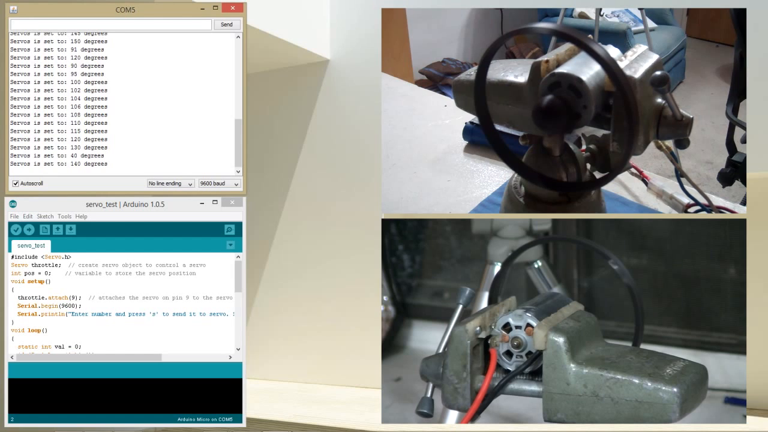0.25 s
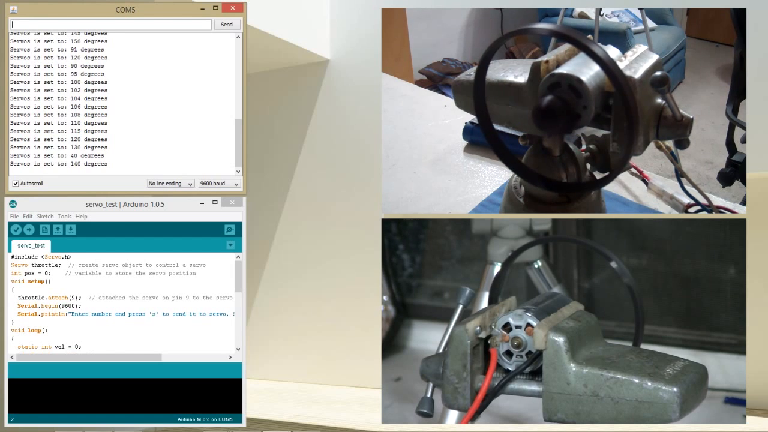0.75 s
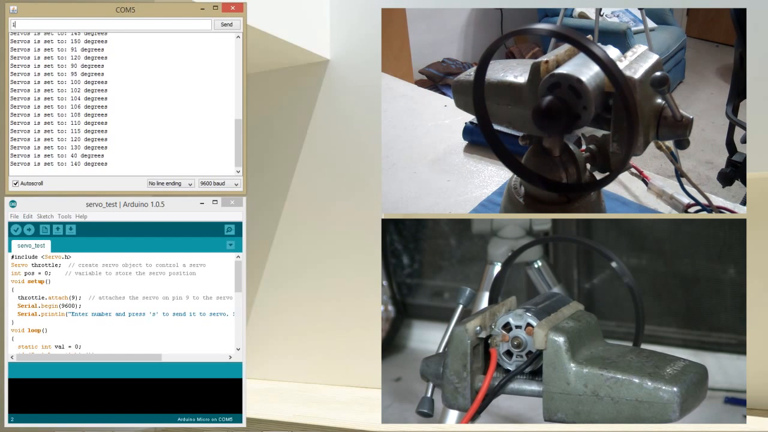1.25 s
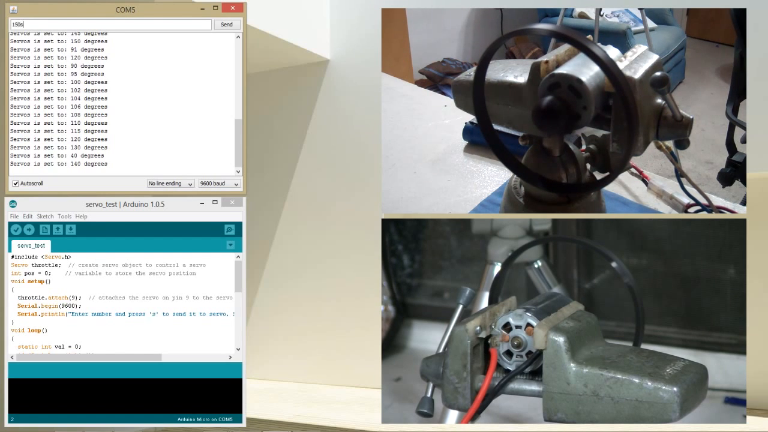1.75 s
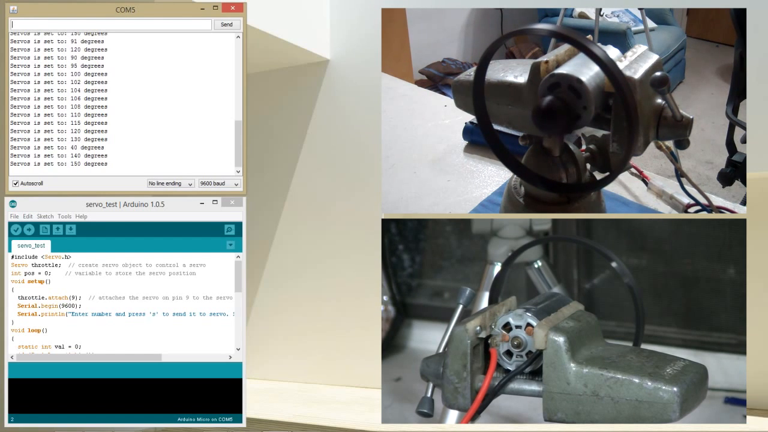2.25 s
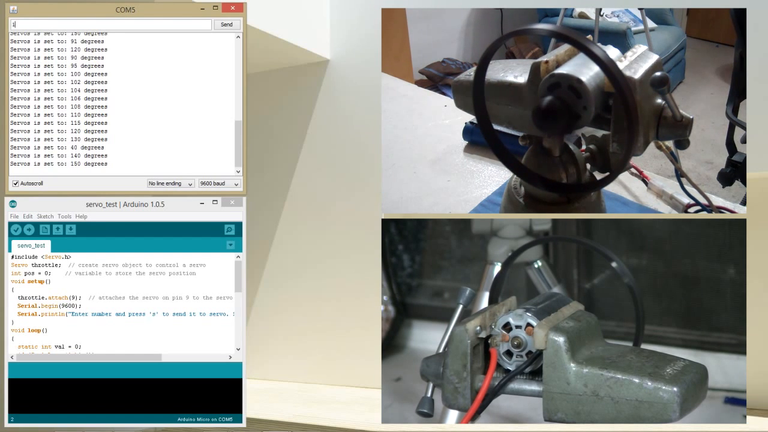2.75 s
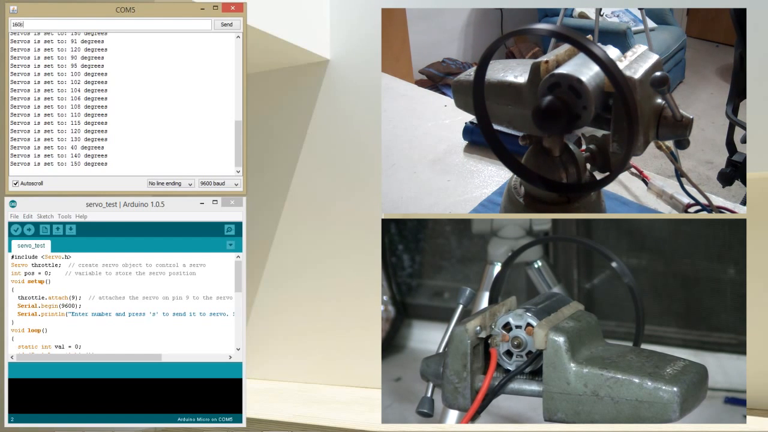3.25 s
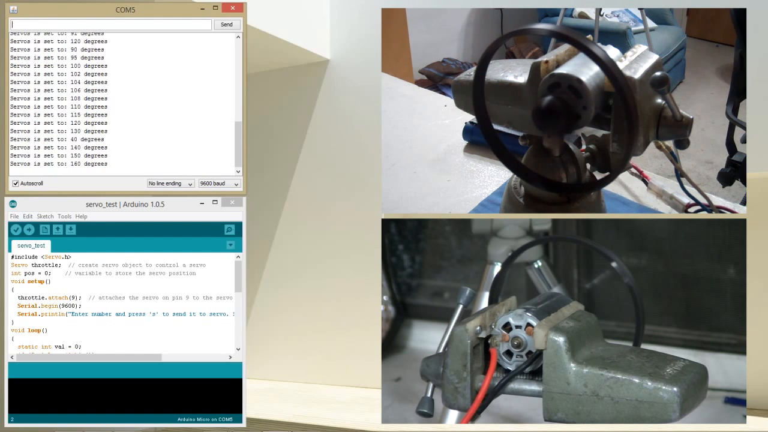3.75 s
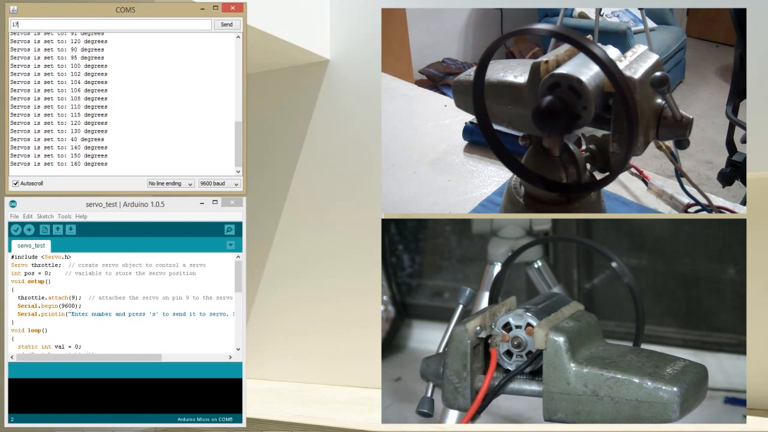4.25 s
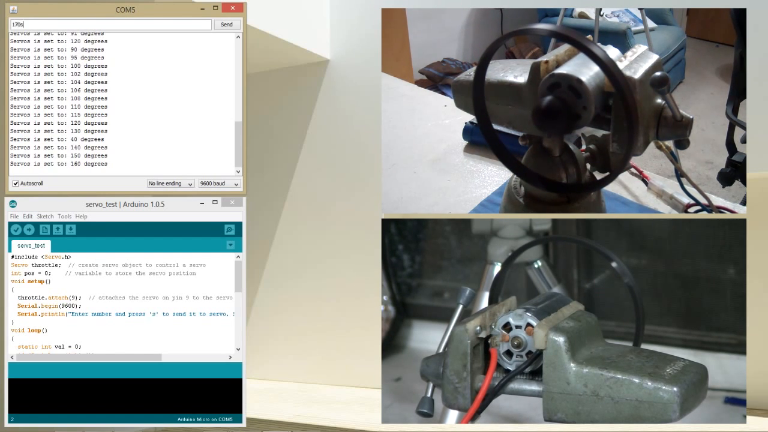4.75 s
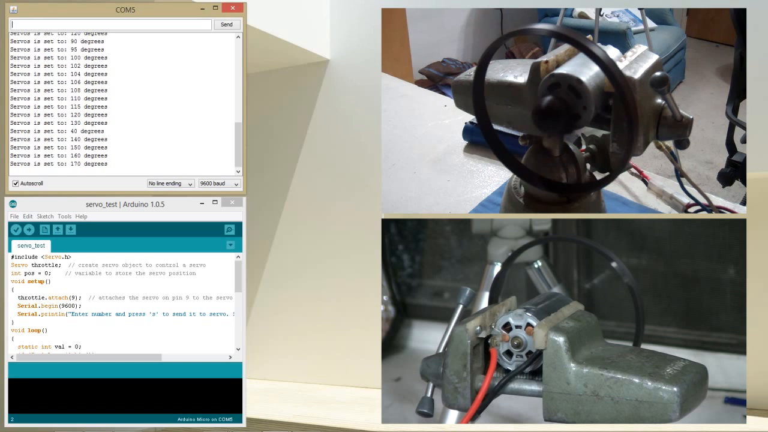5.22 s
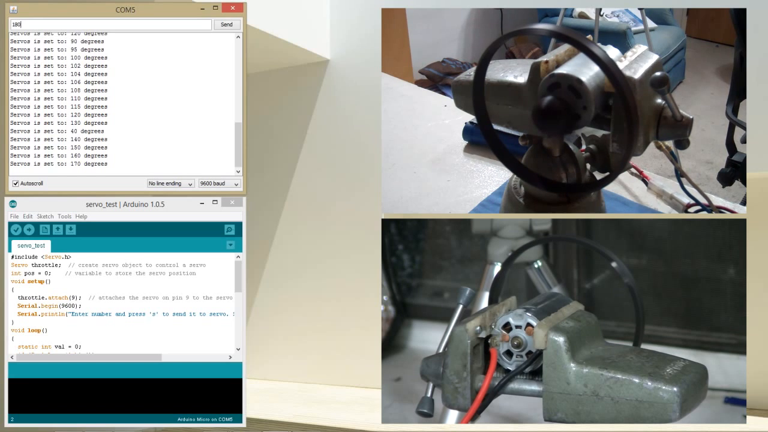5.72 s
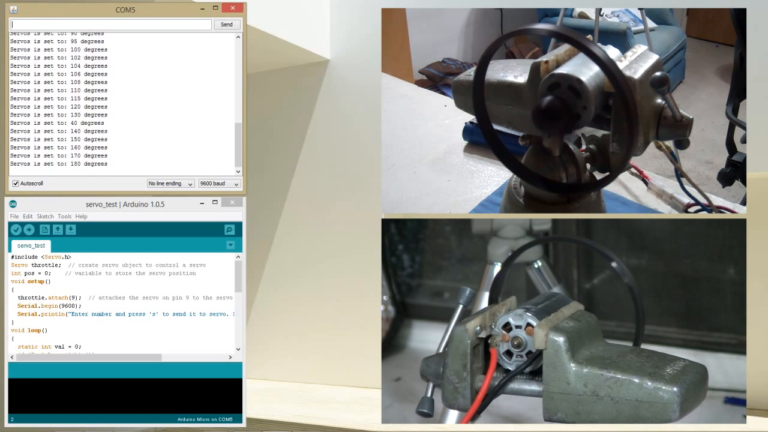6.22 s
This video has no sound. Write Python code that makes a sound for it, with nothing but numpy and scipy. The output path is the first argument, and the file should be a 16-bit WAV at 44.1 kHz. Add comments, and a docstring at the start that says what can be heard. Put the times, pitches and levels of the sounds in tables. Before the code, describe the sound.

At the start a small electric motor is already whirring its propeller at medium-high speed, but power drops at about 0.05 s and the rushing air collapses in pitch and level. Around 0.3-0.4 s only a soft metallic rasp, thin steady high whine and faint room rumble remain, with dull taps near 0.03 and 0.15 s. At 0.37 s the throttle opens: whir and blade noise sweep upward, bright and hissy, swelling rapidly until about 1.6 s, when the controller whine stops. From there to about 6.3 s it holds a loud, dense, slightly fluttering rush with steady shaft hum and ringing bench resonances. Low key-press thuds fall at 0.7 s, several between 1.7 and 2.4 s, then stronger from 3.1 s roughly every third to half second. Close pickup in a small room, mostly centred; it ends still at full speed.

```python
"""Bench motor throttled up

A brushless motor in a bench vice coasts to a fifth of full speed, is throttled up and spins its propeller flat out.
Blade noise is shaped by humps that climb with the shaft, then coloured by the resonances of bench and room.
Shaft tones and a metallic rasp follow the motor's speed; the controller whines most plainly in the lull.
Key presses thud as two low desk modes, each leaving a rumble over the steady noise of the room."""
import sys
import numpy as np
from scipy import signal
from scipy.fft import rfft, irfft, next_fast_len
from scipy.io import wavfile
from scipy.ndimage import map_coordinates

SR = 44100
rng = np.random.default_rng(int(sys.argv[2]) if len(sys.argv) > 2 else 0)


def generate_wav(signal):
    """Clip the signal to [-1, 1] and save it as 16-bit WAV at the path in sys.argv[1]."""
    frames = np.transpose(np.atleast_2d(signal))
    scaled = np.clip(frames, -1, 1) * 32767
    pcm = np.round(scaled).astype(np.int16)
    wavfile.write(sys.argv[1], SR, pcm)


N = 285768
TIME = np.arange(N) / SR


def amp(db):
    """Decibels to gain."""
    return 10 ** (np.asarray(db) / 20)


def unit(x):
    """Scale to rms 1."""
    return x / np.sqrt(np.mean(x ** 2) + 1e-20)


def along(points, hz):
    """Read (frequency [Hz], value) points on a log frequency axis."""
    f, v = np.transpose(points)
    return np.interp(np.log(hz + 1), np.log(f + 1), v)


def bells(rows, at):
    """Summed dB of (centre, width, dB) resonance bells."""
    return sum(db / (1 + (2 * (at - centre) / width) ** 2) for centre, width, db in rows)


def wobble(rate):
    """A smooth random curve with the given number of knots a second."""
    knots = rng.standard_normal(int(N * rate / SR) + 4)
    return map_coordinates(knots, [TIME * rate])


def filtered(x, response):
    """Shape x by a response of frequency."""
    m = next_fast_len(N + SR // 2)
    spectrum = rfft(x, m) * response(np.fft.rfftfreq(m, 1 / SR))
    return irfft(spectrum, m)[..., :N]


def noise(spectrum):
    """Noise of rms 1 with the given (frequency [Hz], level [dB]) colour."""
    return unit(filtered(rng.standard_normal(N), lambda hz: amp(along(spectrum, hz))))


# throttle cut, throttle opened again, full throttle reached (s)
CUT_S, OPEN_S, FULL_S = .055, .372, 1.64
# shaft turns a second: before the cut, at full speed, and where drag would balance the drive
START_HZ, FULL_HZ, BALANCE_HZ = 186, 245.2, 250.2
# time constants of slowing down, of speeding up and of the current's fall and rise (s)
COAST_S, SPIN_UP_S, CURRENT_S = .245, .575, 0.034


def motor(t=TIME):
    """Speed and load, both 0-1: the rotor coasts, then is driven against drag that grows with speed squared."""
    coasting_s = np.clip(t, CUT_S, OPEN_S) - CUT_S
    driven_s = np.maximum(t - OPEN_S, 0)
    coasting_hz = START_HZ * np.exp(-coasting_s / COAST_S)
    shaft_hz = BALANCE_HZ * np.tanh(np.arctanh(coasting_hz / BALANCE_HZ) + driven_s / SPIN_UP_S)
    speed = np.minimum(shaft_hz / FULL_HZ, 1)
    current = np.exp(-coasting_s / CURRENT_S) + 1 - np.exp(-driven_s / CURRENT_S)
    return speed, (1 - speed ** 2) * current


def part_throttle(knee):
    """1 up to the knee speed, falling to 0 between there and full speed."""
    speed, _ = motor()
    return np.clip((1 - speed) / max(1 - knee, .01), 0, 1)


# below this share of full speed the blades hardly stir the air and the motor runs smoothly; steepness of that fall
HUSH_SPEED, HUSH_POWER = 0.27, 6.2


def hush(speed):
    """Gain that falls away as the rotor comes near rest."""
    return 1 / (1 + (HUSH_SPEED / speed) ** HUSH_POWER)


# rushing air: level at full speed (dB), power of the speed, lift under full load (dB)
FLOW_DB, FLOW_POWER, FLOW_LOAD_DB = -14.5, 2.6, 3


def flow():
    """Strength of the rushing air: a power of the speed, a little more under load."""
    speed, load = motor()
    return amp(FLOW_DB + FLOW_LOAD_DB * load) * speed ** FLOW_POWER * hush(speed)


# vortex shedding at full speed, before surges: (centre [shaft rates], width [shaft rates], boost [dB])
VORTICES = [(1, .3, 4), (4.1, .6, 6.5), (6.78, 1, 10.5), (13.2, 1.03, 4)]
# hiss above 9 kHz under load, before power is evened out: lift at full load (dB), power of the load
TREBLE_DB, TREBLE_POWER = 30, 3.5


def turbulence(air, flutter_db, slow_tilt_db, wander):
    """Blade noise: vortex bands follow the shaft, wander and surge a little; a slow rotor sounds duller."""
    eddies = rng.standard_normal(N) * amp(flutter_db * wobble(900))
    hz, t, z = signal.stft(eddies, SR, nperseg=1024)
    speed, load = motor(t)
    shedding_hz = FULL_HZ * speed * (1 + wander * np.interp(t, TIME, wobble(35)))
    hz = hz[:, None]
    shedding_db = 0
    for band in VORTICES:
        surge = 1 + 0.13 * np.interp(t, TIME, wobble(22))
        shedding_db = shedding_db + speed * surge * bells([band], hz / shedding_hz)
    body_db = slow_tilt_db * (1 - speed) * bells([(640, 4300, 0.86)], hz)
    treble_db = TREBLE_DB * load ** TREBLE_POWER * hz ** 4 / (hz ** 4 + 9000 ** 4)
    gain = amp(shedding_db + body_db + treble_db)
    # the bands share out the power without adding any
    power_share = amp(along(air, hz[:, 0])) ** 2
    gain /= np.sqrt(np.average(gain ** 2, axis=0, weights=power_share))
    return signal.istft(z * gain, SR, nperseg=1024)[1][:N]


def reflections(x, echo_db, count=40):
    """Weak copies from nearby walls ripple the spectrum."""
    delay_s = rng.uniform(.004, .06, count)
    size = rng.standard_normal(count)
    walls = np.bincount((delay_s * SR).astype(int), size / np.linalg.norm(size))
    return x + amp(echo_db) * signal.fftconvolve(x, walls)[:N]


# base colour of the rushing air: (frequency [Hz], relative level per Hz [dB])
AIR = [(20, -21.5), (90, -19.5), (160, -15.5), (320, -20), (450, -17.5), (650, -16.5), (800, -8),
       (1300, -2), (2500, -1.15), (4000, 0), (6000, -4), (8000, -13.5), (10000, -15), (15500, -33.5)]
# resonances and notches of bench and room: (centre [Hz], width [Hz], boost or cut [dB])
BENCH = [(160, 30, -6), (232, 50, 6), (274, 18, 5), (538, 95, 10.5), (702, 44, 4), (791, 45, 6.3),
         (990, 70, 5), (1223, 18, 4), (1408, 24, -6), (1454, 20, 5.5), (1483, 18, -6), (1578, 22, 2.5),
         (1638, 24, 2), (1865, 50, -2.5), (1921, 28, 5), (2019, 47, 2.7), (2095, 18, -4), (2120, 18, 5.5),
         (2263, 18, 3), (2423, 22, 4.5), (2659, 60, 2), (2845, 22, 3), (3150, 30, 2.3), (3495, 38, 3.2),
         (3640, 46, 3.8), (3853, 87, 2.6), (4148, 44, 4.2), (4850, 150, 1.8), (6298, 62, 2)]


def rush():
    """Turbulence rings in bench and room, as loud as the flow is strong."""
    eddies = turbulence(AIR, flutter_db=0.52, slow_tilt_db=21.5, wander=0.02)
    coloured = filtered(eddies, lambda hz: amp(along(AIR, hz) + bells(BENCH, hz)))
    return unit(reflections(coloured, echo_db=-11.5)) * flow() * amp(0.045 * wobble(14))


# faint noise opposed between the channels, strongest from 2.6 to 8.5 kHz, at every speed:
# (frequency [Hz], relative level per Hz [dB])
FAINT_SIDE = [(150, -42), (300, -31), (480, -12), (900, -26), (1300, -41), (1600, -31), (2100, -29),
              (2600, 1.5), (4200, 5), (6200, -3.5), (8500, 6), (11300, -12), (12200, -40)]
# broad noise opposed between the channels, for the slower rotor: (frequency [Hz], relative level per Hz [dB])
BROAD_SIDE = [(30, -4), (150, -19), (300, -14), (550, -5), (2000, -2), (4000, 7), (10000, -3), (14000, -24)]
# relative to the flow (dB): faint noise, broad noise at low speed, lift of both under full load
FAINT_SIDE_DB, BROAD_SIDE_DB, SIDE_LOAD_DB = -34, -23, 16


def width(fade_from, fade_to):
    """Noise opposed between the channels follows the flow: the broad one fades with speed, the faint one does not."""
    speed, load = motor()
    broad_db = BROAD_SIDE_DB + np.interp(speed, [fade_from, fade_to], [0, -45])
    opposed = amp(FAINT_SIDE_DB) * noise(FAINT_SIDE) + amp(broad_db) * noise(BROAD_SIDE)
    return flow() * amp(SIDE_LOAD_DB * load + wobble(12)) * opposed


# modes of the motor's metal bell: (centre [Hz], width [Hz], relative level [dB])
BELL = [(550, 66, 3.5), (762, 86, 2), (1740, 60, 9), (1810, 36, 7), (2860, 100, -25), (4020, 190, -3),
        (4900, 110, -19), (6170, 120, -5)]
# level at full speed (dB), lift at part throttle (dB), change under full load (dB), power of the speed
RASP_DB, RASP_PART_DB, RASP_LOAD_DB, RASP_POWER = -40, 11.5, -0.5, 1.16


def rasp():
    """Bearings and magnets shake the modes of the motor's bell, with extra level at part throttle."""
    speed, load = motor()
    rasp_db = RASP_DB + RASP_PART_DB * part_throttle(knee=0.78) + RASP_LOAD_DB * load

    def metal(f):
        """Sum of resonances with alternating sign."""
        return sum((-1) ** k * amp(db) * 1j * f * w / (c * c - f * f + 1j * f * w)
                   for k, (c, w, db) in enumerate(BELL))

    ringing = unit(filtered(rng.standard_normal(N), metal))
    return amp(rasp_db) * speed ** RASP_POWER * hush(speed) * ringing


# controller overtones, before wavering and load: (multiple of the switching rate, level [dB])
WHINE = [(3, -73), (4, -60), (5, -64), (6, -72), (7, -59), (8, -76), (9, -78)]
SWITCH_HZ = 976.8
# switching tone: level before the speed scales it (dB), power of the speed
SWITCH_DB, SWITCH_POWER = -34.5, 3.2
# overtones: change under full load (dB), depth of wavering (dB)
WHINE_LOAD_DB, WHINE_WAVER_DB = -12, 2.5


def controller(fade_s):
    """Chopped current makes the windings sing at the switching rate and its multiples, until full throttle."""
    speed, load = motor()
    chopping = np.clip((FULL_S - TIME) / fade_s, 0, 1)
    angle = 2 * np.pi * SWITCH_HZ * TIME
    overtones = sum(amp(db + WHINE_WAVER_DB * wobble(25.4)) * np.sin(k * angle + .45 * wobble(70))
                    for k, db in WHINE)
    switching = amp(SWITCH_DB) * speed ** SWITCH_POWER * np.sin(angle)
    return np.sqrt(2) * chopping * (switching + amp(WHINE_LOAD_DB * load) * overtones)


# shaft and blade tones, levels before speed and wavering:
# (multiple of the shaft rate, level at full speed [dB], level while speeding up [dB], power of the speed)
TONES = [(1, -51, -40.5, 4), (2, -43.5, -46, .7), (3, -57, -55, 2), (4, -40.5, -55, 2.6),
         (5, -40.5, -45, 2.6)]


def rotor(waver_db, rising_waver_db, settle_s):
    """Tones locked to the shaft: weak while it coasts, unsteady as they climb, rebalanced at full speed."""
    speed, _ = motor()
    angle = 2 * np.pi * np.cumsum(FULL_HZ * speed * (1 + 0.0009 * wobble(12))) / SR
    driven = np.interp(TIME, [OPEN_S, OPEN_S + settle_s], [.1, 1])
    settled = np.interp(TIME, [FULL_S - settle_s, FULL_S], [0, 1])
    unsteady_db = waver_db * settled + rising_waver_db * (1 - settled)
    tones = 0
    for k, full_db, rising_db, power in TONES:
        level_db = full_db * settled + rising_db * (1 - settled) + unsteady_db * wobble(15)
        tones = tones + amp(level_db) * speed ** power * np.sin(k * angle)
    return np.sqrt(2) * tones * driven


# colour of the rumble in desk and room: (frequency [Hz], relative level per Hz [dB])
ROOM = [(8, 2), (27, 5), (40, -10), (53, 0), (80, -23), (105, -9), (127, 2), (160, -28), (250, -8),
        (350, -13), (600, -16), (2000, -60)]
# colour of the steady air noise: (frequency [Hz], relative level per Hz [dB])
ROOM_AIR = [(60, -8), (130, -3), (300, -2), (600, -7), (2000, -30)]
# steady rumble before its wavering, and steady air noise (dB)
RUMBLE_DB, ROOM_AIR_DB = -56, -60
# rumble after each bump: time constant of the rise, time to fall 60 dB (s)
RUMBLE_RISE_S, RUMBLE_T60_S = .025, 1.7


def room(hiss_db):
    """Every bump leaves a low rumble in desk and room, over steady rumble, air noise and faint hiss."""
    power = amp(RUMBLE_DB) ** 2
    for s, _, _, db in KEYS:
        age = np.maximum(TIME - s, 0)
        swell = 1 - np.exp(-age / RUMBLE_RISE_S)
        power = power + (amp(db - 60 * age / RUMBLE_T60_S) * swell) ** 2
    rumble = np.sqrt(power) * amp(1.8 * wobble(17)) * noise(ROOM)
    return rumble + amp(ROOM_AIR_DB) * noise(ROOM_AIR) + amp(hiss_db) * rng.standard_normal(N)


# key presses and softer bumps on the desk, levels before swell and decay:
# (time [s], low desk mode level [dB], high desk mode level [dB], rumble level [dB])
KEYS = [(0.028, -45, -37, -47), (0.152, -58, -37, -45), (.68, -45, -46, -50), (1.69, -42, -38, -39),
        (1.85, -36, -44, -35), (2.12, -41, -46, -52), (2.30, -42, -45, -47), (2.40, -52, -37, -62),
        (3.118, -31, -33, -39), (3.482, -35, -31, -37), (3.784, -39, -27, -45), (4.208, -30, -36, -47),
        (4.59, -41, -43, -42), (4.948, -26.5, -33.5, -36), (5.239, -34, -27, -41), (5.733, -28, -33, -37),
        (6.051, -35.5, -36, -45), (6.28, -39, -50, -46)]
# modes of the desk: (nominal frequency [Hz], hold [s], time to fall 60 dB after the hold [s])
DESK = [(53, .065, 0.2), (126.7, 0.019, 0.35)]


def keys(attack):
    """Each key press sets two low modes of the desk swinging: they swell, hold and die."""
    out, t = np.zeros(N + SR), np.arange(SR // 2) / SR
    swell = 1 - np.exp(-t / attack)
    for s, *levels, _ in KEYS:
        for db, (hz, hold, t60) in zip(levels, DESK):
            # each press lands at a slightly different pitch
            swing = np.sin(2 * np.pi * hz * (1 + 0.033 * rng.standard_normal()) * t)
            decay = amp(db - 60 * np.maximum(t - hold, 0) / t60)
            out[round(s * SR):][:len(t)] += decay * swell * swing
    return out[:N]


def scene():
    """Both channels carry the same sources; noise that follows the flow is opposed between them."""
    mid = rush() + rasp() + controller(fade_s=.06)
    mid += rotor(waver_db=1, rising_waver_db=4.0, settle_s=0.37)
    mid += room(hiss_db=-65) + keys(attack=0.0075)
    side = width(fade_from=.66, fade_to=0.98)
    return np.array([mid + side, mid - side])


TOP_HZ = 15700


def record(dry):
    """The recorder keeps nothing above its band limit."""
    return filtered(dry, lambda hz: hz < TOP_HZ)


dry = scene()
out = record(dry)
generate_wav(out)
```